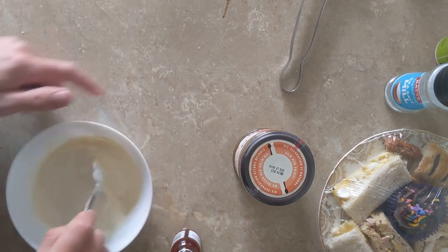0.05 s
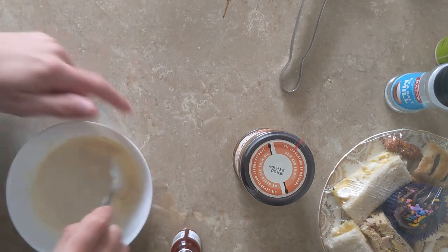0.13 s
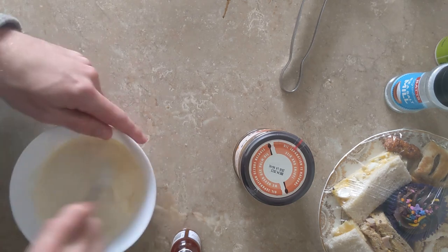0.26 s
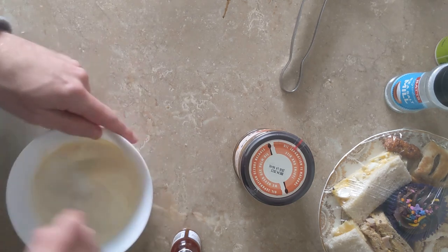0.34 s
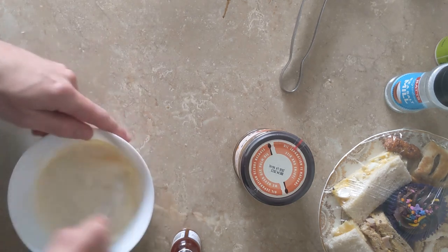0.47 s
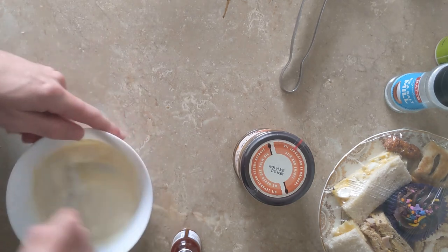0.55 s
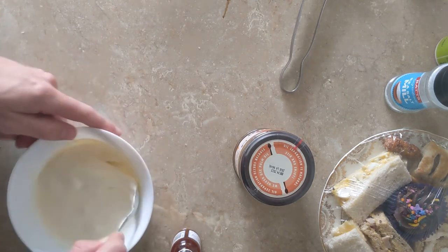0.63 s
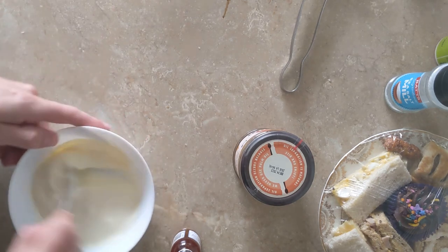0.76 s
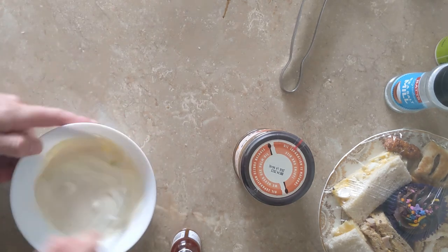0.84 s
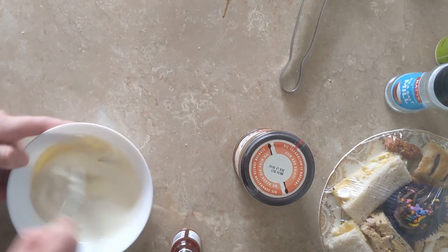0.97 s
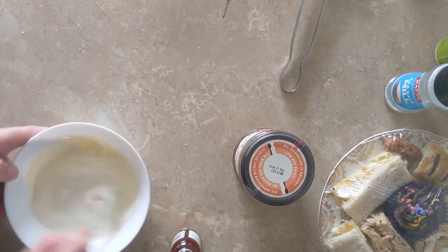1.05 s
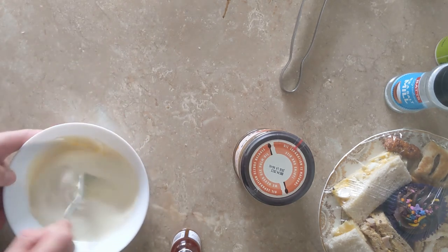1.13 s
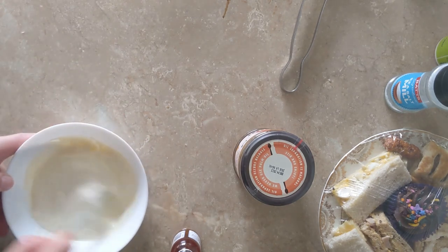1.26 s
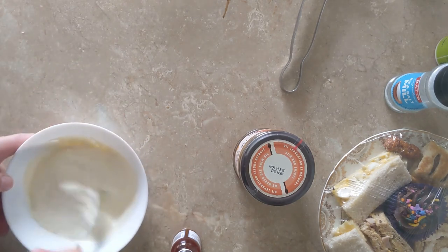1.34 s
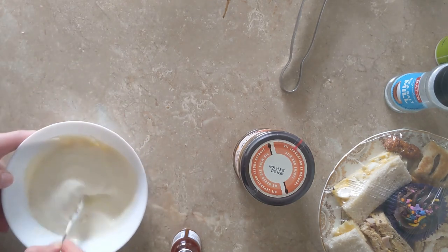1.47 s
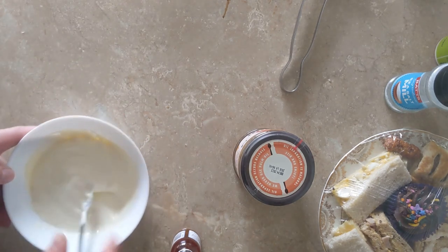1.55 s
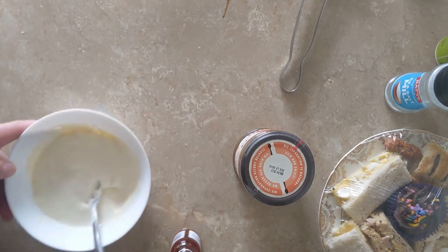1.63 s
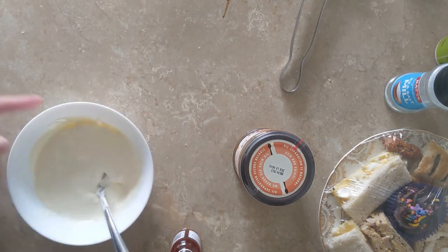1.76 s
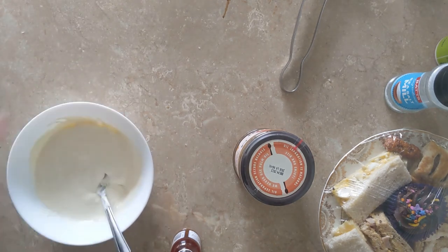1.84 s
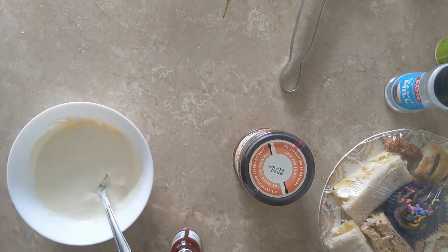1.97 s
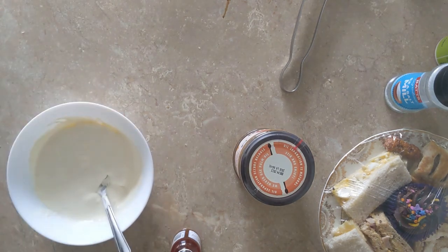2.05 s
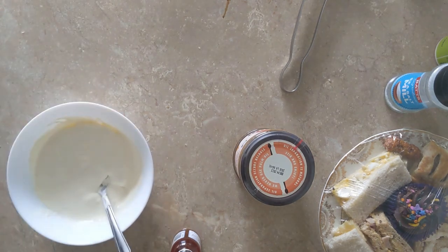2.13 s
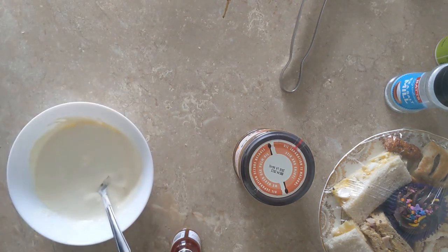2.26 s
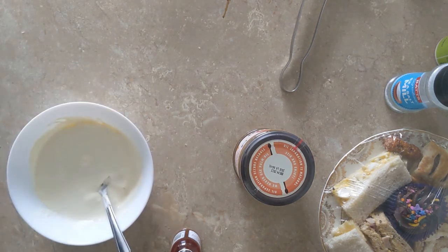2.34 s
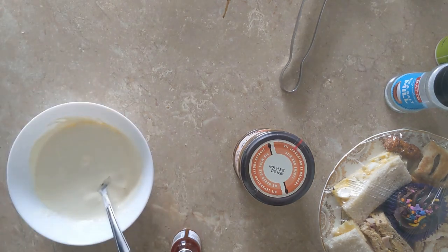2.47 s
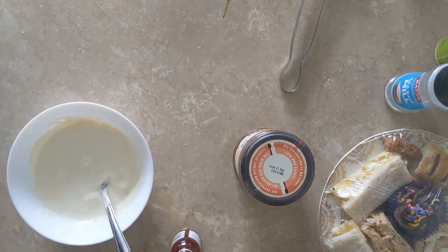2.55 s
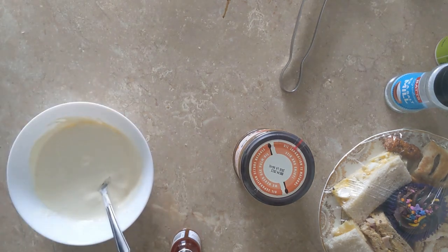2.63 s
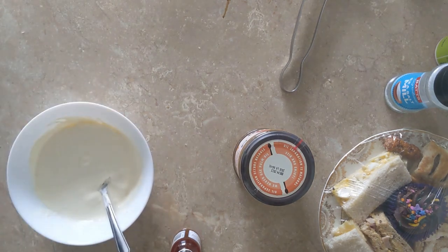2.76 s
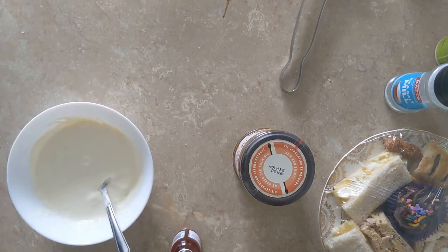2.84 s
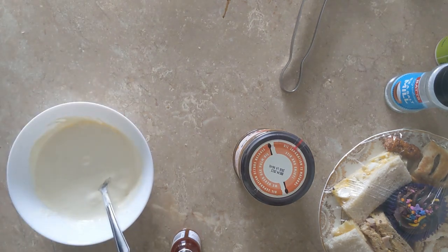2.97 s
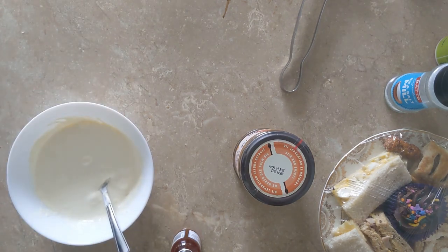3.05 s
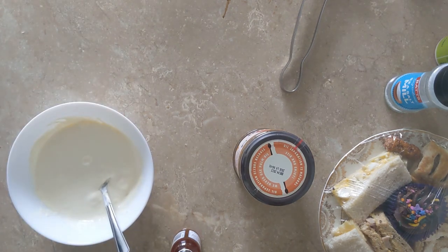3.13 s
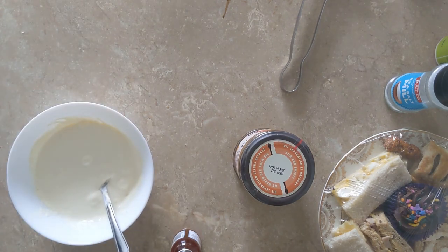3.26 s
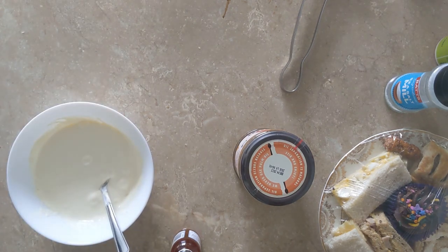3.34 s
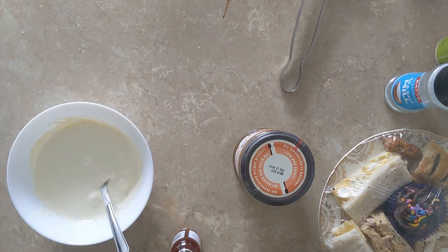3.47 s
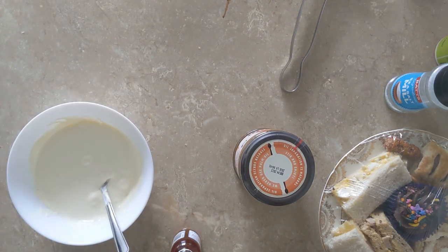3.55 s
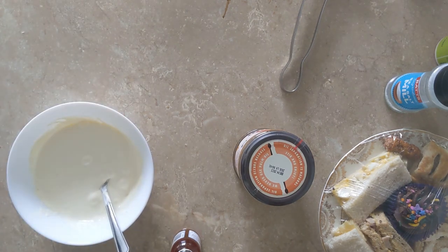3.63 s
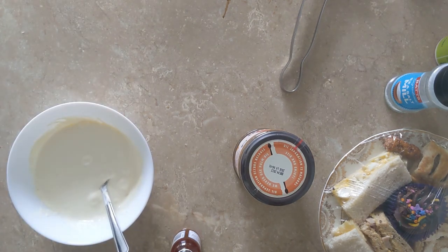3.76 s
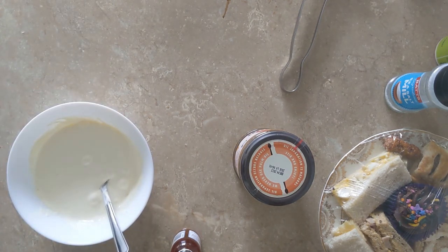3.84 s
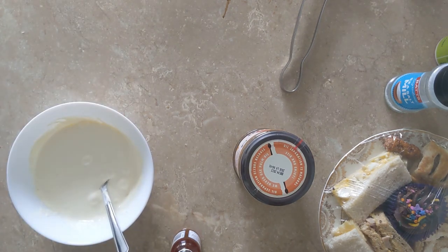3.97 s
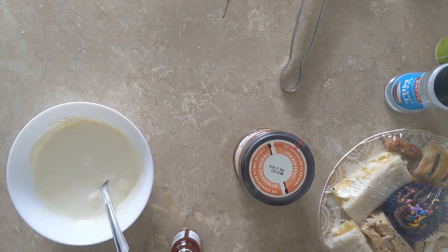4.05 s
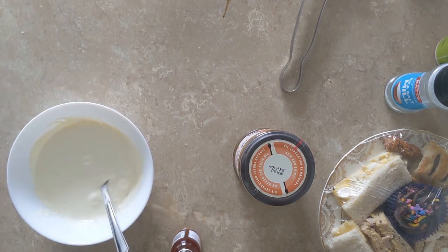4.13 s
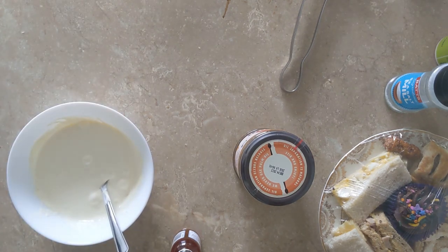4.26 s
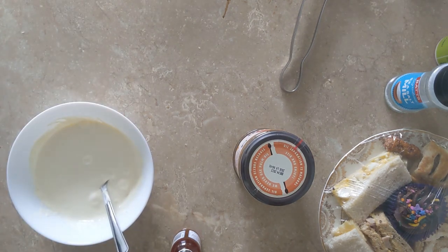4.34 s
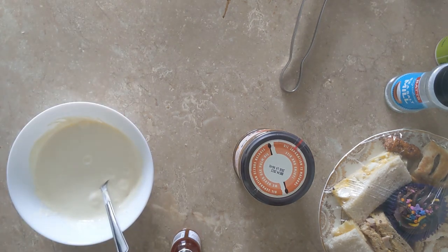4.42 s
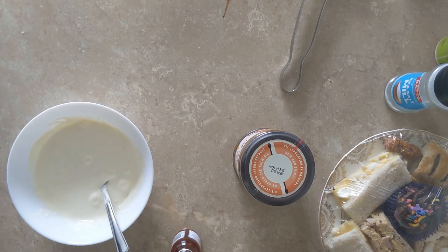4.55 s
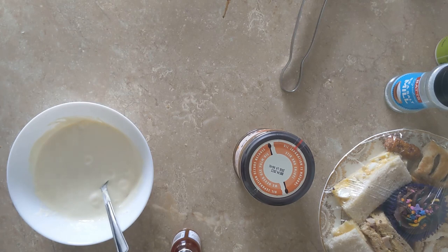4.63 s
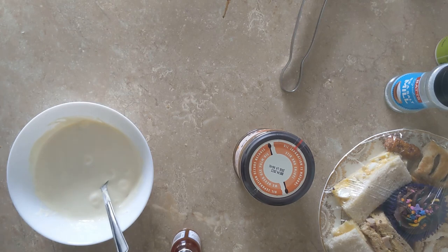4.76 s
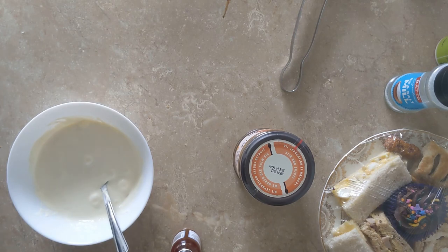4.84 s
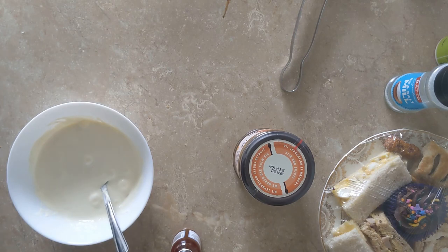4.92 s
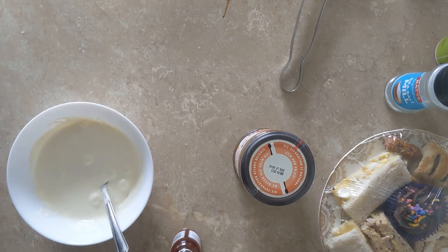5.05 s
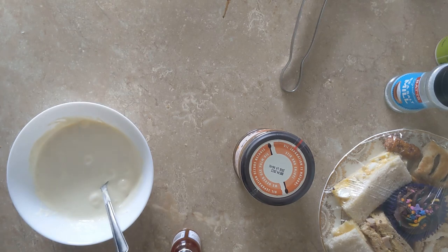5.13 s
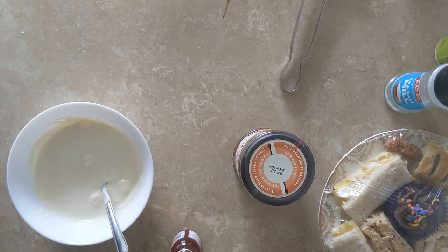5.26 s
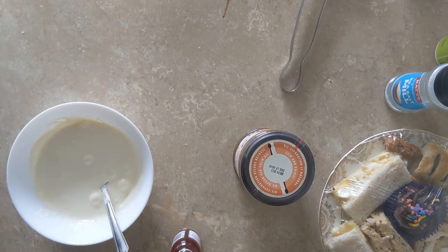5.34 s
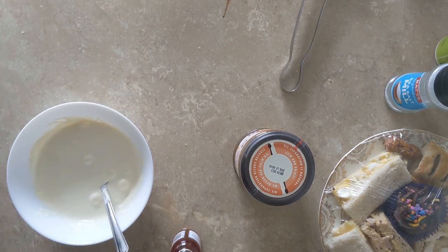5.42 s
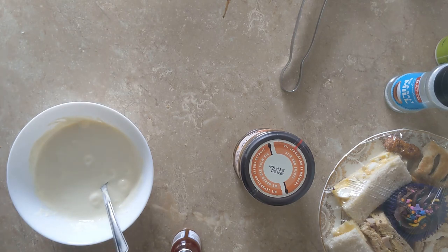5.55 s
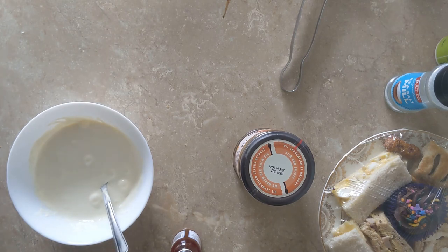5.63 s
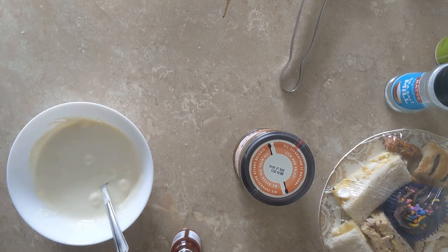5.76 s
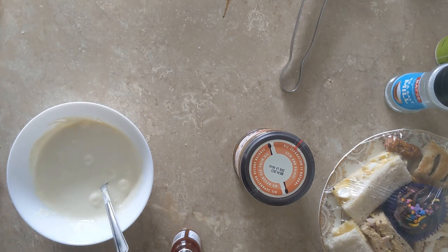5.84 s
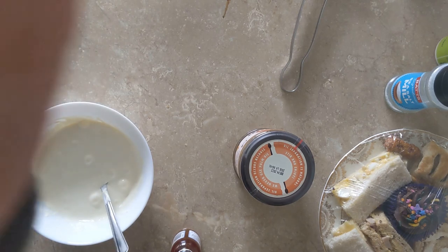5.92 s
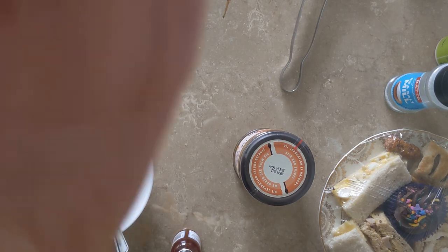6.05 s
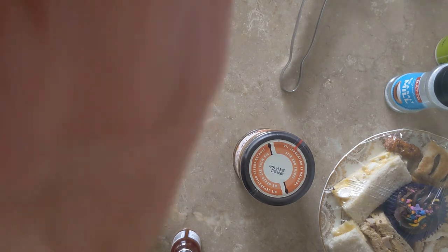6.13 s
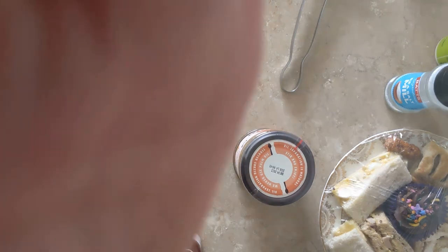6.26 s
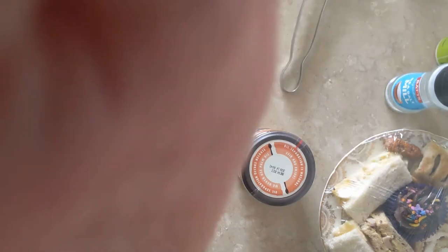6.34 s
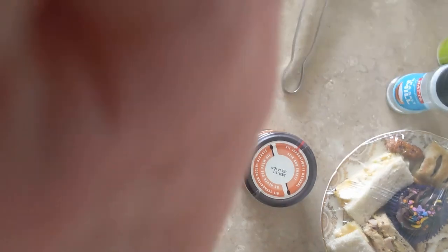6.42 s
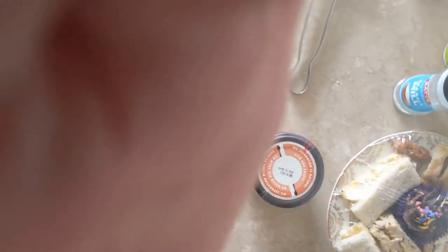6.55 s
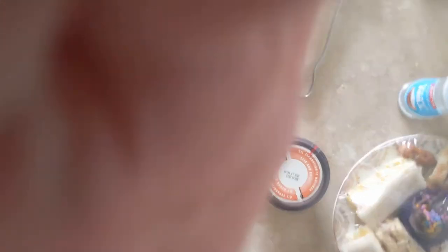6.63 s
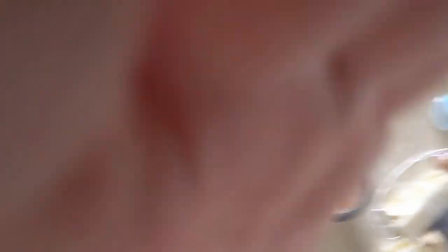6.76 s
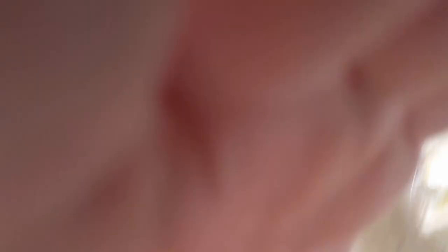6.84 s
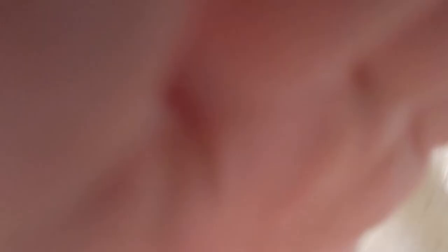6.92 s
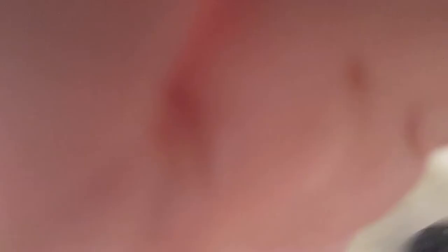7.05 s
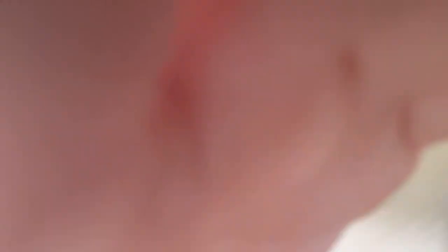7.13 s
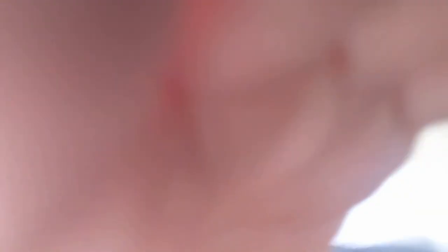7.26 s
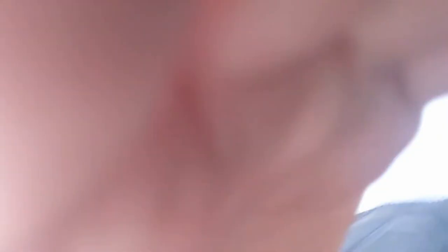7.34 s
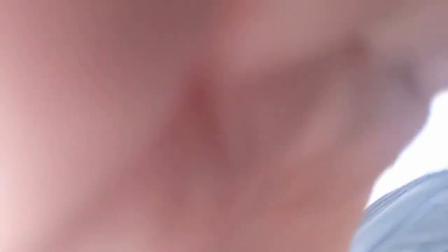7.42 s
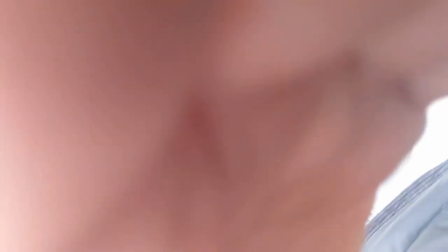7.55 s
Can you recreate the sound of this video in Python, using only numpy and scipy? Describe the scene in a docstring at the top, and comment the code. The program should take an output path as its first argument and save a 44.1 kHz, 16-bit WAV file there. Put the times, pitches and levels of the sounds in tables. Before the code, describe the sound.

A metal spoon knocks and scrapes briskly in a cream-filled china bowl, clinks onto the rim, then clothes rustle and a hand fumbles the microphone.

```python
"""Low room noise runs throughout, with soft footfalls and bumps: shaped noise.
A steel spoon stirs thick cream in a china bowl: knocks on the damped wall are clicks plus short modes,
scrapes and shoved cream are grainy noise. Let go, the spoon clinks on the rim, which rings in modes.
Clothes rustle as the cook moves round and a sleeve sweeps close by: swelling noise.
Last, a hand rubs, slides and taps on the camera. A small hard room answers the spoon and bowl."""
import sys
import numpy as np
from scipy import signal
from scipy.fft import rfft, irfft, next_fast_len
from scipy.io import wavfile
from scipy.ndimage import uniform_filter1d

SR = 44100
rng = np.random.default_rng(int(sys.argv[2]) if len(sys.argv) > 2 else 0)


def file_out(sig):
    """Save sig as 16-bit WAV at sys.argv[1]."""
    # one column per channel
    cols = np.atleast_2d(sig).T
    # limit, then scale
    lim = np.clip(cols, -1, 1)
    pcm = np.round(lim * 32767).astype(np.int16)
    wavfile.write(sys.argv[1], SR, pcm)


N = 334719
TIME = np.arange(N) / SR
AGE = TIME[:SR // 2]  # seconds since a blow
LAG_SAMPLES = 21  # extra delay to the right port


def amp(db):
    """Decibels to gain."""
    return 10 ** (np.asarray(db) / 20)


def unit(x):
    """Scale to rms 1."""
    return x / np.sqrt(np.mean(x ** 2) + 1e-20)


def along(points, hz):
    """Interpolate (freq_hz, value) points on a log frequency axis."""
    freq_hz, value = np.transpose(points)
    return np.interp(np.log(hz + 1), np.log(freq_hz + 1), value)


def swells(rows, rise):
    """Gain of motions (top_s, level_db, length_s): exponential rise for a share of the length, then decay."""
    rise = np.clip(rise, .05, .95)
    power = 0
    for top_s, level_db, length_s in rows:
        distance_s = np.maximum((top_s - TIME) / rise, (TIME - top_s) / (1 - rise))
        power = power + (amp(level_db) * np.exp(-distance_s / length_s)) ** 2
    return np.sqrt(power)


GRIP_S = 0.027  # time constant of the soft edges


def holds(rows):
    """Gain of steady motions (start_s, end_s, level_db) with exponential edges."""
    gain = 0
    for start_s, end_s, level_db in rows:
        outside_s = np.abs(TIME - np.clip(TIME, start_s, end_s))
        gain = gain + amp(level_db) * np.exp(-outside_s / GRIP_S)
    return gain


def filtered(x, response):
    """Multiply the spectrum of x by a response of frequency."""
    size = next_fast_len(N + 8192)
    return irfft(rfft(x, size) * response(np.fft.rfftfreq(size, 1 / SR)), size)[..., :N]


# left-right likeness of noise: freq_hz, likeness
ALIKE = [(60, 0.95), (130, 0.84), (290, 0.63), (640, 0.27), (1400, 0.12), (3100, 0.05)]


def friction(spectrum, grain_db):
    """Stereo noise of rms 1, made of millisecond slips of uneven size."""
    slips = np.interp(TIME, np.arange(8000) / 1000, rng.standard_normal(8000))
    pair = rng.standard_normal((2, N)) * amp(grain_db * slips)

    def mid_side(hz):
        turn = np.arccos(np.clip(along(ALIKE, hz), -1, 1)) / 2
        return amp(along(spectrum, hz)) * [np.cos(turn), np.sin(turn)]

    mid, side = filtered(pair, mid_side)
    return unit(np.array([mid + side, mid - side]))


def patchy(x, depth_db):
    """The colour of rubbing drifts as the touching surfaces change."""
    z = signal.stft(x, nperseg=512)[2]
    field = uniform_filter1d(rng.standard_normal(z.shape[1:]), size=7, axis=0)  # over frequency
    field = unit(uniform_filter1d(field, size=18, axis=1))  # over time
    return unit(signal.istft(z * amp(depth_db * field), nperseg=512)[1][:, :N])


def crack(spectrum):
    """A causal (minimum-phase) click of peak 1 with the given colour."""
    level_db = np.maximum(along(spectrum, np.fft.rfftfreq(len(AGE), 1 / SR)), -60)
    cepstrum = irfft(np.log(amp(level_db)))
    cepstrum[1:] *= 2
    cepstrum[len(AGE) // 2:] = 0
    click = irfft(np.exp(rfft(cepstrum)))
    return click / np.abs(click).max()


# colour of a blow by the spoon: freq_hz, level_db
KNOCK_COLOUR = [(150, -12), (320, -21), (550, -8.5), (1000, -2), (1800, 0), (3500, -0.5), (5500, 3),
                (8000, -6.5), (10000, -0.5), (13000, -2.5), (15500, -11)]


def softened(cut_hz):
    """Colour of a blow cushioned above the cut-off."""
    return [(hz, db - 10 * np.log10(1 + (hz / cut_hz) ** 4)) for hz, db in KNOCK_COLOUR]


def chatter(click, share, t60):
    """A contact trails off in tiny random rebounds that spread it in time."""
    rebounds = rng.standard_normal(len(AGE)) * amp(-60 * AGE / t60)
    train = rfft(share * rebounds / np.linalg.norm(rebounds) + (AGE == 0))
    spread = irfft(train / np.sqrt(np.abs(train)))[:len(AGE) // 2]  # evens out the colour
    return signal.fftconvolve(click, spread)[:len(AGE)]


def ring(modes, pitch=1, life=1, cut_hz=SR):
    """Damped modes (freq_hz, level_db, t60_s), struck at slightly new strengths each time."""
    total = 0
    for hz, db, t60 in modes:
        decay = amp(db + rng.normal(0, 1) - 60 * AGE / (t60 * life))
        softening = 1 + (hz / cut_hz) ** 4
        tone = np.sin(2 * np.pi * hz * pitch * AGE + rng.uniform(0, 2 * np.pi))
        total = total + decay / softening * tone
    return total * (1 - np.exp(-AGE / 0.000051))


def add(out, start_s, x):
    """Mix x in from start_s."""
    start = round(start_s * SR)
    out[:, start:start + x.shape[1]] += x[:, :N - start]


# reverberation of the kitchen: freq_hz, t60_s
KITCHEN = [(150, 0.17), (1000, 0.32), (3000, 0.29), (7500, 0.28), (15000, 0.31)]


def in_kitchen(x, wet_db, shadow_db):
    """Sound from the bowl: direct on the left, late and shaded on the right, plus a decaying room tail."""
    hz, t, z = signal.stft(rng.standard_normal((2, len(AGE))), SR, nperseg=256)
    tail = signal.istft(z * amp(-60 * t / along(KITCHEN, hz)[:, None]), SR, nperseg=256)[1]
    paths = amp(wet_db) * tail / np.linalg.norm(tail[0])
    paths[0, 0] += 1
    paths[1, LAG_SAMPLES] += amp(shadow_db)
    return signal.fftconvolve(x[None], paths, axes=1)[:, :N]


def from_left(pair):
    """Sound from the cook's side reaches the right port late."""
    return np.array([pair[0], np.pad(pair[1], (LAG_SAMPLES, 0))[:N]])


# room noise: freq_hz, level_db
FLOOR = [(12, -28), (20, -9.5), (79, -2.5), (110, -18), (270, -25.5), (301, -33), (367, -22.5),
         (718, -25.5), (802, -21), (897, -30), (2260, -21.5), (2460, -26), (3740, -23.5), (4300, -26),
         (16000, -37)]
FLOOR_DB = -53
# soft footfalls: top_s, level_db, length_s
THUDS = [(.655, -44, .057), (1.9, -45.5, 0.077), (2.62, -42, 0.12), (3.6, -42, 0.064), (6.52, -39, 0.046)]
# dull bumps against the furniture: top_s, level_db
BUMPS = [(2.505, -48), (6.125, -51), (6.505, -50.5)]
BUMP_S = 0.034


def background():
    """Low noise and hiss of the room, with dull thuds through floor and furniture."""
    thud_colour = [(20, -9), (35, 4.5), (55, 6), (100, -29), (300, -51), (1000, -80)]
    bump_colour = [(60, -18), (150, -4), (260, -5.0), (600, -6), (1200, -17), (4000, -37)]
    thuds = swells(THUDS, rise=0.5) * friction(thud_colour, grain_db=-5)
    bump_gain = swells([(top_s, level_db, BUMP_S) for top_s, level_db in BUMPS], rise=0.38)
    bumps = bump_gain * friction(bump_colour, grain_db=-4)
    return amp(FLOOR_DB) * friction(FLOOR, grain_db=-2.0) + thuds + bumps


# spoon meets the damped wall: start_s, level_db, thump_db, ping_db, cut_hz, room_db (levels relative)
KNOCKS = [(0.287, -23.5, -37.5, -31, 7000, -0.5), (0.548, -10.5, -41, -19, 7240, -3),
          (0.739, -20, -39, -8, 14000, -1), (0.9508, -8.5, -36, -21, 12900, 0.5),
          (1.0091, -15, -50, -23, 7000, -3), (1.1481, -6.5, -34, -6.5, 15100, -2),
          (1.3364, -8, -35.5, -22, 8000, -2.5), (1.512, -7.5, -42, -13.5, 8500, -1.5)]
# gripped spoon: freq_hz, level_db, t60_s
PING = [(9460, 1, 0.0095), (9830, -1, 0.011), (9930, -4.5, 0.013), (12300, -3, 0.0033)]
# bowl on the counter: freq_hz, level_db, t60_s
THUMP = [(163, -6.5, 0.13), (218.8, 0, 0.23), (443, 1, 0.081), (513, 2, 0.047), (631, 6.5, 0.039)]


def knocks():
    """Cream chokes the china: a dry crack, a short ping of steel and a thump into the counter."""
    out = np.zeros((2, N))
    for start_s, level_db, thump_db, ping_db, cut_hz, room_db in KNOCKS:
        blow = chatter(crack(softened(cut_hz)), share=1.3, t60=0.0065)
        blow = blow + amp(ping_db - 7.5) * ring(PING)
        blow = blow + amp(thump_db) * ring(THUMP)
        add(out, start_s, amp(level_db + 7) * in_kitchen(blow, wet_db=room_db, shadow_db=-13))
    return out


# spoon drags along the wall: top_s, level_db, length_s (levels relative)
SCRAPES = [(.38, -46.5, 0.032), (.605, -42.5, 0.022), (.765, -42, 0.021), (.795, -34, .012),
           (.813, -30.5, 0.016), (1.012, -26.5, .018), (1.19, -35.5, 0.025), (1.374, -30, 0.019)]
SCRAPE_RISE = 0.51  # share of the length
# spoon shoves cream aside: top_s, level_db, length_s (levels relative)
SHOVES = [(.35, -59.5, 0.07), (.52, -56.5, 0.26), (.99, -55, 0.29), (1.75, -50.5, 0.17)]
STIR_START_S, STIR_END_S = 0.31, 1.82
RUMBLE_DB, RUMBLE_EASE_DB_PER_S = -55, 7  # the bowl rocks less as the cream loosens


def stirring():
    """Steel scrapes the glaze; the cream squelches and the bowl rumbles on the counter."""
    glaze_colour = [(300, -12.0), (1200, -6), (2500, -8.0), (3500, 2), (4500, 0.0), (5500, -2),
                    (7500, -3.0), (10000, -0.5), (13000, -7.5), (16000, -21)]
    cream_colour = [(250, -30), (450, -11.0), (750, -2.5), (1500, -20.5), (4000, -27), (12000, -47.0)]
    bowl_colour = [(120, -27), (170, -11), (220, 5.5), (260, -4.5), (320, -30)]
    drag = swells(SCRAPES, SCRAPE_RISE) * friction(glaze_colour, grain_db=-3.0)[0]
    scrape = in_kitchen(drag, wet_db=-3, shadow_db=-23)
    cream = swells(SHOVES, rise=0.42) * friction(cream_colour, grain_db=4.5)
    rumble = holds([(STIR_START_S, STIR_END_S, RUMBLE_DB)])
    rumble = rumble * amp(-RUMBLE_EASE_DB_PER_S * (TIME - STIR_START_S))
    bowl = rumble * friction(bowl_colour, grain_db=-1)
    return amp(3) * scrape + from_left(amp(5) * cream) + bowl


# loose spoon on the rim: start_s, level_db, pitch_ratio, ring_time_ratio, cut_hz, crack_db, room_db
CLINKS = [(1.6259, -9, 0.93, 0.33, 5500, 0, -5.5), (1.7296, -20, 1, .2, 15100, 1, 10),
          (1.7322, -5, 1, 0.77, 20200, -12, 1.5)]
# spoon and rim: freq_hz, level_db, t60_s (when free)
RIM = [(721, -31, .28), (1045, -28, .08), (1631, -28, .1), (1992, -28, .1), (2805, -23, .16),
       (3300, -21, .015), (4105, -13, .04), (4184, -12, .05), (4292, -5, .045), (4323, -19, .33),
       (4400, -12, .05), (4460, -12, .04), (4700, -16, .015), (5943, -21, .04), (7736, -15, .04),
       (7858, -17, .05), (7926, -13, .09), (8118, -19, .025), (10070, -18, .025), (10530, -18, .012),
       (10990, -18, .012), (11900, -18, .01), (12520, -15, .015), (12900, -15, .012), (13300, -15, .012),
       (13590, -14, .018), (14100, -18, .01), (15120, -21, .02)]


def clinks():
    """The spoon touches the rim softly, then drops on it and rings free."""
    out = np.zeros((2, N))
    for start_s, level_db, pitch, life, cut_hz, crack_db, room_db in CLINKS:
        blow = ring(RIM, pitch, life, cut_hz)
        blow = blow + amp(crack_db) * chatter(crack(softened(cut_hz)), share=1.6, t60=0.01)
        blow = blow + amp(-33.5) * ring(THUMP)
        add(out, start_s, amp(level_db) * in_kitchen(blow, wet_db=room_db, shadow_db=-7))
    return out


# movements of the clothes: top_s, level_db, length_s, crispness_db (levels relative)
MOVES = [(2.084, -55, 0.45, -3), (2.3, -52.5, 0.37, -4.5), (2.488, -52.5, 0.19, -6.5),
         (2.673, -53.5, 0.14, -3), (2.878, -55, 1, -5.5), (3.184, -58.5, 0.27, -7), (3.52, -59, 0.52, -2),
         (3.861, -54.5, 0.085, 1.5), (3.949, -52.5, 0.18, -2.5), (4.2, -60, 0.14, -4),
         (4.375, -63, 0.21, 3), (4.554, -62.5, 0.26, 1.5), (4.774, -54.5, 0.12, -2.5),
         (4.936, -61, 0.18, 4), (5.113, -55, 0.17, 4), (5.378, -55.5, 0.52, -10.5),
         (5.965, -60.5, 0.056, 0), (6.14, -54, 0.56, -10.5)]
MOVE_RISE = 0.5  # share of the length
# heavy folds: freq_hz, level_db
FOLD = [(88, -29), (150, -14), (259, -11.5), (294, -18), (650, 0.5), (710, -8), (769, 1.5), (937, -3),
        (1390, -8), (1600, -9.5), (2080, -33), (3520, -120)]
FOLD_DB, FOLD_PER_CRISP = -3.5, -0.16  # gain of folds; dB of fold per dB of crispness
# rubbed weave: freq_hz, level_db
RUB = [(760, -43), (1300, -5), (1400, 3.5), (1560, -5.5), (2300, 0.5), (3200, -1.5), (3870, 0),
       (5590, -3.5), (7000, -18), (9100, -33), (15400, -120)]
# crisp cloth: freq_hz, level_db
SWISH = [(3530, -14), (6000, -4), (7370, -9.5), (10200, -3.5), (12200, -9), (15200, -11), (16000, -25)]


def clothes():
    """Each movement rubs the weave; crisp ones swish more, slack ones flap in heavy folds."""
    def moves(db_per_crisp):
        rows = [(top_s, db + db_per_crisp * crisp, length_s) for top_s, db, length_s, crisp in MOVES]
        return swells(rows, MOVE_RISE)

    folds = amp(FOLD_DB) * moves(FOLD_PER_CRISP) * patchy(friction(FOLD, grain_db=-3.5), depth_db=1)
    weave = amp(5.5) * moves(0) * patchy(friction(RUB, grain_db=-1.0), depth_db=3.0)
    swish = amp(7.5) * moves(1) * patchy(friction(SWISH, grain_db=1.5), depth_db=1.4)
    return from_left(folds + weave + swish)


# a sleeve sweeps close by: top_s, level_db, length_s
SLEEVE = [(6.17, -50, 0.26), (6.34, -46.5, 0.33)]


def sleeve():
    """Tight weave sliding on itself gives a narrow hiss."""
    colour = [(1500, -20), (3300, -12.5), (4000, -3.5), (4700, -13), (6500, -18.5), (12000, -36)]
    return swells(SLEEVE, rise=0.36) * friction(colour, grain_db=3.0)


# palm rubs the case: start_s, end_s, level_db (before side gains)
PALM = [(6.36, 6.62, -53.5), (6.79, 6.895, -46.5), (6.96, 7.19, -51.5), (7.29, 7.49, -52)]
# palm skin: freq_hz, level_db
SKIN = [(120, -35), (200, -9), (491, -8.5), (763, -4.5), (1040, -4.5), (1180, -2.5), (1300, -3),
        (1500, -1.5), (3620, -4.5), (5040, -5.5), (6760, -16.5), (11500, -12.5), (16000, -31)]
# fingers slide on the case: top_s, level_db, length_s (before side gains)
SLIDES = [(6.551, -36.5, 0.025), (6.587, -39.5, 0.044), (6.738, -34.5, 0.033), (6.756, -36.5, 0.014),
          (6.855, -43.5, 0.038)]
# case under sliding fingers: freq_hz, level_db
CASE = [(88, -36), (150, -4.5), (309, -11), (451, -9), (647, -11), (725, -3), (1160, -4), (1580, 0),
        (2690, -10), (4930, -7), (7070, -18), (14000, -31)]
# fingers tap the case: start_s, level_db, left_minus_right_db, centre_hz
TAPS = [(6.3639, -18.5, 11, 970), (6.3689, -21, 20, 1380), (6.406, -18.5, 23, 4600),
        (6.5172, -1.5, -34, 11500), (6.542, -29, 0, 2400), (6.6294, -21.5, 30, 1430),
        (6.705, -25.5, 13, 684), (6.708, -19, -22, 10700), (6.88, -26, 16, 1600), (7.387, -27, 18, 4140),
        (7.389, -30, 23, 2830)]
# case thud: freq_hz, level_db, t60_s
HOUSING = [(78.5, -1, 0.053), (170, -6, .015), (420, 3, 0.0079), (750, -2, .012)]
TAP_THUD_DB, THUD_DB_PER_OCTAVE = -17, -4  # at a 1 kHz centre; sharper taps thud less


def handling():
    """Skin rubs, slides and taps on the case, nearer one microphone port or the other."""
    palm = holds(PALM) * patchy(friction(SKIN, grain_db=2.0), depth_db=3.5)
    slides = swells(SLIDES, rise=0.51) * patchy(friction(CASE, grain_db=-1), depth_db=2.0)
    out = palm * amp([[3], [-.5]]) + slides * amp([[3], [-3]])
    for start_s, level_db, pan_db, hz in TAPS:
        click = crack([(hz / 8, -14), (hz / 2, -9), (hz, 0), (hz * 0.99, -4), (hz * 6, -24)])
        ports = np.array([chatter(click, share=0.41, t60=0.0083) for side in range(2)])
        sides = amp([[pan_db / 2], [-pan_db / 2]])
        thud_db = TAP_THUD_DB + THUD_DB_PER_OCTAVE * np.log2(hz / 1000)
        tap = ports * sides / sides.mean() + amp(thud_db) * ring(HOUSING)
        add(out, start_s, amp(level_db) * tap)
    return out


def scene():
    """Everything in the kitchen."""
    return background() + knocks() + stirring() + clinks() + clothes() + sleeve() + handling()


FULL_SCALE, TOP_HZ = .85, 16000


def record(dry):
    """The camera clips at full scale, then a steep low-pass sets its band limit."""
    clipped = np.clip(dry, -FULL_SCALE, FULL_SCALE)
    return filtered(clipped, lambda hz: 1 / (1 + (hz / TOP_HZ) ** 120))


dry = scene()
out = record(dry)
file_out(out)
```